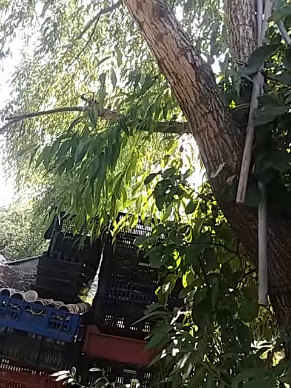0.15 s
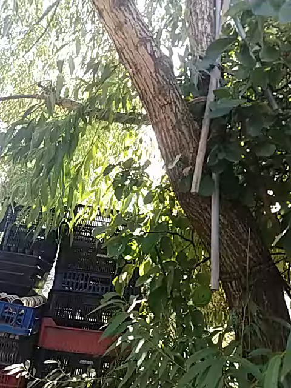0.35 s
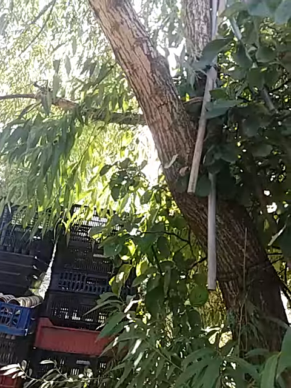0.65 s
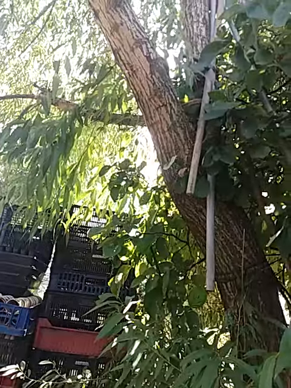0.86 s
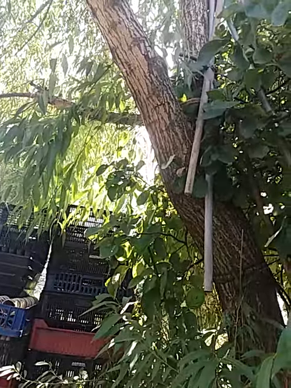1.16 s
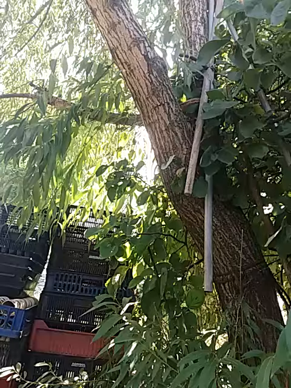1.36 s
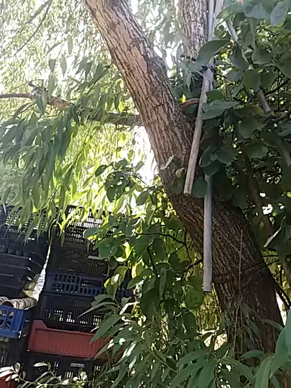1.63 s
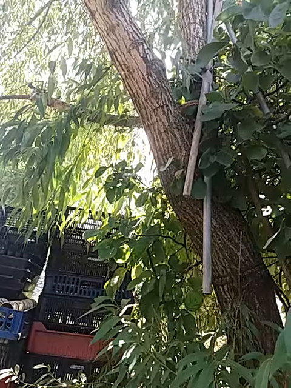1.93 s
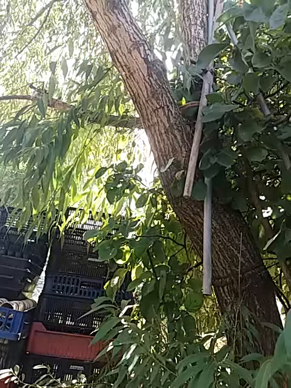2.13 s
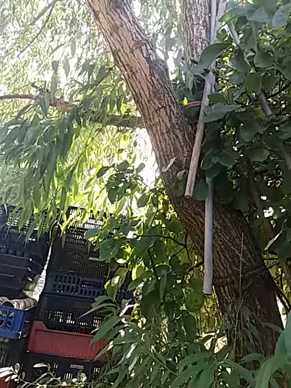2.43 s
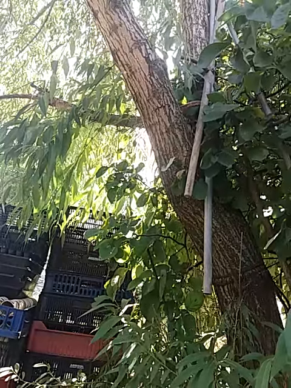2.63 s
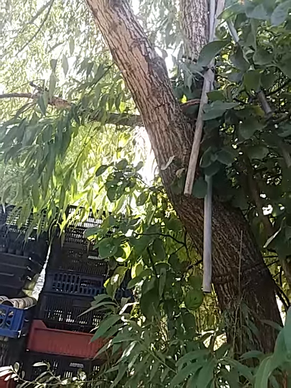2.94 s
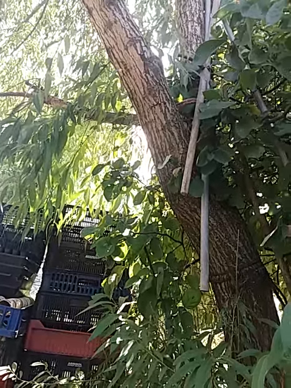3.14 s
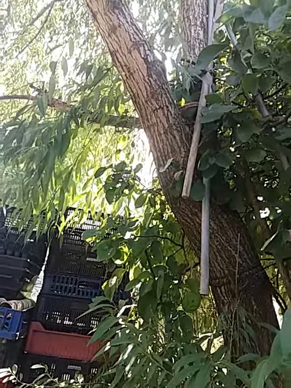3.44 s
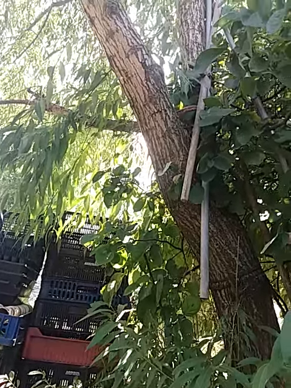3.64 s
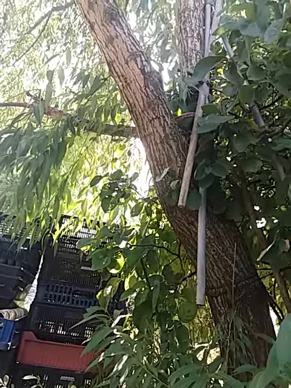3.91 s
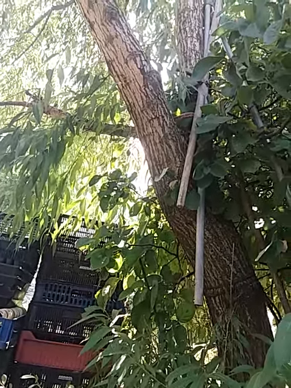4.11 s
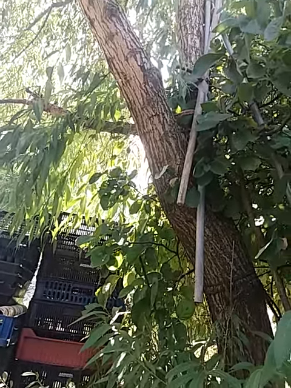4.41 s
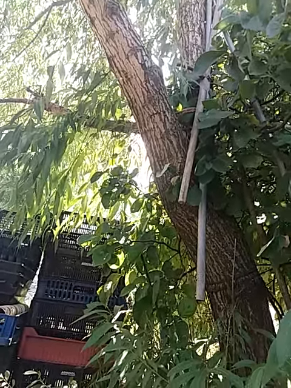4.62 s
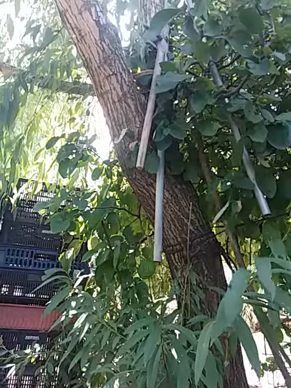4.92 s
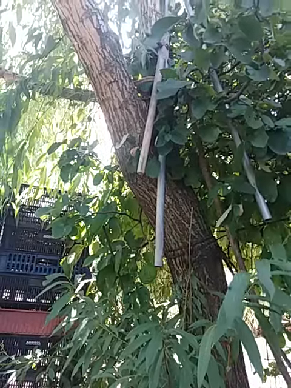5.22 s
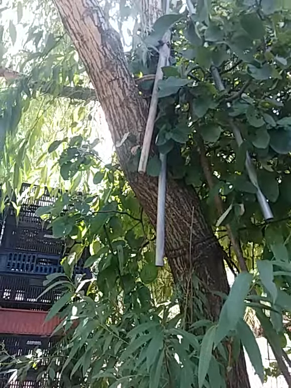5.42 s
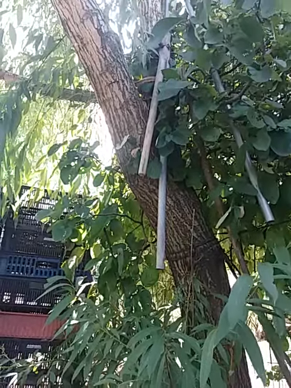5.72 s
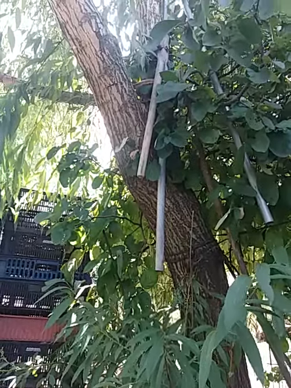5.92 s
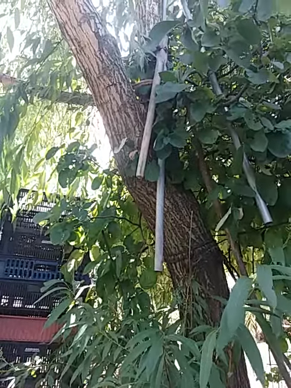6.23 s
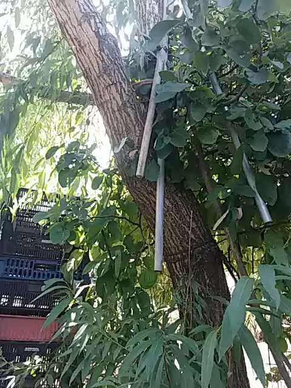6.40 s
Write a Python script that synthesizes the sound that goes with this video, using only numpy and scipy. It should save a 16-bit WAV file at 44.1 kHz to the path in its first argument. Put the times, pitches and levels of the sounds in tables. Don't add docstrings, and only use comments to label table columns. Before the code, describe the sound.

Loud, liquid quail calls snap out about once a second in a quiet leafy yard, with short echoes and faint distant birds.

```python
import sys
import numpy as np
from scipy import signal
from scipy.io import wavfile
from scipy.ndimage import uniform_filter1d, map_coordinates

SR = 44100
rng = np.random.default_rng(int(sys.argv[2]) if len(sys.argv) > 2 else 0)


def to_linear_factor(level_db):
    exponent = np.asarray(level_db, float) / 20
    return 10 ** exponent


def to_wav(s):
    ch = np.atleast_2d(s).T
    pcm = np.round(np.clip(ch, -1, 1) * 32767)
    wavfile.write(sys.argv[1], SR, pcm.astype(np.int16))


N = 289296


# time_ms, pitch_hz, level_db
NOTE_SHAPE = [(-21, 1480, -36), (-16, 1590, -10), (-11, 1790, 1.5), (-5, 1870, 4.4), (-1, 2340, -3.6),
              (1, 2580, 1), (2.5, 3350, -10), (5.5, 3950, -18), (8, 4500, -38)]
# time_ms, pitch_hz, level_db
LEAD_SHAPE = [(-37.5, 980, -25.5), (-30.5, 1080, -10.5), (-26, 1200, -9), (-19.5, 1400, -17.5),
              (-6, 980, -21)]
# whip_s, effort_db, lead_db
WHISTLED_NOTES = [(.285, -12, -38), (0.4691, -2, -22.5), (0.6105, -1, -31), (1.24, -3.5, -31),
                  (1.423, 0, -20), (1.563, -0.5, -29), (2.1676, -4.5, -33.5), (2.3529, -0.5, -22),
                  (2.4953, -1, -28), (3.1592, -4.5, -34), (3.3422, -0.5, -23), (3.485, -1.5, -27),
                  (4.653, 0.5, -36.5), (4.792, -1, -21.5), (5.4412, -4.5, -34), (5.6232, -0.5, -20),
                  (5.762, -0.5, -19.5), (6.3841, -4, -35), (6.5675, 1, -22.5)]


def quail_calls(hums, start, end):
    dry = np.zeros(N + SR // 10)
    ms = np.arange(-40, 10, 1000 / SR)
    for whip_s, effort_db, lead_db in WHISTLED_NOTES:
        if start - .1 < whip_s < end - .1:
            note = to_linear_factor(effort_db) * whistle(NOTE_SHAPE, ms)
            lead = to_linear_factor(lead_db) * whistle(LEAD_SHAPE, ms)
            add(dry, whip_s - .041, note + lead)
    for start_s, hum in hums:
        add(dry, start_s, hum)
    return dry


# pitch_hz, level_db
OVERTONE_STRENGTH = [(2350, -0.5), (2900, -49), (4800, -41), (5500, -49), (6200, -34), (7200, -51.5),
                     (8200, -28.5), (9500, -55)]


def whistle(shape, ms):
    at_ms, hz, db = np.transpose(shape)
    hz, level = np.interp(ms, at_ms, hz), to_linear_factor(np.interp(ms, at_ms, db, left=-99, right=-99))
    hz, level = uniform_filter1d([hz, level], size=40)
    turn = 2 * np.pi * np.cumsum(hz) / SR
    tone = np.sin(turn)
    for k in range(2, 6):
        overtone_db = read(OVERTONE_STRENGTH, k * hz) - 11 * (k - 2)
        tone += to_linear_factor(overtone_db) * np.sin(k * turn)
    return level * tone


# start_s, end_s, first_pitch_hz, level_db, beak_overtones_db
GROWLED_HUMS = [
    (0.249, 0.407, 1050, -61, 27.5),
    (0.508, 0.599, 955, -34, 15.5),
    (0.68, 0.77, 1040, -42.5, 15),
    (1.461, 1.547, 972, -33, 19.5),
    (2.396, 2.481, 976, -31.5, 15.5),
    (3.387, 3.46, 974, -31.5, 13),
    (4.723, 4.787, 980, -36, 2),
    (5.673, 5.739, 960, -38, 5.5),
]


def quail_hums():
    return [(row[0], growl(*row)) for row in GROWLED_HUMS]


# first_hz, last_hz
BEAK_SLIDE = [3000, 1870]


def growl(start, end, first_hz, db, beak_db):
    n = round((end - start) * SR)
    rise = np.linspace(1, 1.1, n)
    hz = first_hz * rise * (1 + .5 * uniform_filter1d(rng.standard_normal(n), size=200))
    turn = 2 * np.pi * np.cumsum(hz) / SR
    flutter_hz = 125 * (1 + 6 * uniform_filter1d(rng.standard_normal(n), size=400))
    flutter = 2 * np.pi * np.cumsum(flutter_hz) / SR
    swell = to_linear_factor(db + np.linspace(-9, 0, n)) * signal.windows.tukey(n, .3)
    beak_hz, beak_width_hz = np.linspace(*BEAK_SLIDE, n), 250
    upper = np.zeros(n)
    for k in range(2, 4):
        upper += np.sin(k * turn) / (1 + ((k * hz - beak_hz) / beak_width_hz) ** 2)
    low = (1 + 0.65 * np.cos(flutter)) * np.sin(turn)
    return swell * (low + to_linear_factor(beak_db) * (.5 + .5 * np.cos(flutter)) ** 2 * upper)


SCENE_CHANGES = [.337, 4.716, 7]
# delay_ms, signed_gain
NEAR_FIRST = [(-.75, -.025), (-.25, .08), (.52, .061), (1.02, -.067), (2.27, -.04), (3.33, .029),
              (4.47, -.044), (10.2, .026), (19.14, -.027), (20.48, -.018)]
NEAR_SECOND = [(-.63, .019), (.09, .059), (1.13, .043), (2.04, .019), (2.61, -.024), (3.04, -.036),
               (3.42, -.017), (7.91, -.024), (15.6, .02), (17.48, .03)]
CLOSENESS = [3.5, 4.5]
# extra_path_m, depth_m, rise_db
WALLS_FIRST = [(6, 7, 7), (20, 4.5, 3.5), (38, 6.2, 4), (53, 12, 3), (102.2, 20, 1.5)]
WALLS_SECOND = [(0, 19, 4.6), (31, 2.6, 4.7), (50, 7, 6.4), (85, 20, 1.8)]
WALL_GAPS = [-1, -2]


def quail_in_yard():
    t, out = np.arange(N) / SR, np.zeros(N)
    hums = quail_hums()
    spots = zip(SCENE_CHANGES, SCENE_CHANGES[1:], (NEAR_FIRST, NEAR_SECOND), CLOSENESS,
                (WALLS_FIRST, WALLS_SECOND), WALL_GAPS)
    for start, end, near, near_db, walls, gap_db in spots:
        heard = yard(quail_calls(hums, start, end), near, near_db, walls, gap_db)[:N]
        here = 1. * ((t >= start) & (t < end))
        out += heard * uniform_filter1d(here, size=40)
    return out


def yard(dry, near, near_db, walls, gap_db):
    taps = np.zeros(SR // 10)
    delay_ms, gain = np.transpose(near)
    taps[np.round((delay_ms + 1) * SR / 1000).astype(int)] = gain
    sway = .35 * np.arange(len(dry)) / SR
    late = np.zeros(len(dry))
    for share in (np.cos, np.sin):
        late += signal.fftconvolve(dry * share(sway), tail(walls, gap_db))[:len(dry)]
    return to_linear_factor(near_db) * signal.fftconvolve(dry, taps)[:len(dry)] + late


# pitch_hz, level_db, foliage_fade_60db_s, far_wall_fade_60db_s
YARD_TAIL = [(980, -22.5, 0.17, 0.4), (1500, -13, 0.36, 0.42), (1740, -30, 0.18, 0.73),
             (2150, -18.5, 0.44, 0.93), (2500, -19, 0.27, 0.7), (3300, -18, .25, 0.82),
             (4300, -17.5, 0.23, 0.75), (6440, -14, 0.54, .5)]


def tail(walls, gap_db):
    taps = np.zeros(SR)
    at = np.arange(200, SR - 20, 20)
    strength = rng.choice([-1., 1.], len(at)) * to_linear_factor(3 * rng.standard_normal(len(at)))
    taps[at + rng.integers(0, 20, len(at))] = strength
    hz, t, z = signal.stft(taps, SR, nperseg=128)
    db, leaves_s, far_s = (read(YARD_TAIL, hz, col=k)[:, None] for k in range(1, 4))
    path_m = 343 * t
    z *= to_linear_factor(db - 20.0 + gap_db + bumps(path_m, walls)) * np.tanh(t / 0.0032) ** 2
    far_walls_db = -16.5
    z *= np.hypot(to_linear_factor(-60 * t / leaves_s), to_linear_factor(far_walls_db - 60 * t / far_s))
    return signal.istft(z, SR, nperseg=128)[1]


# time_s, peak_db, centre_hz, width_hz
LEAF_TICKS = [
    (.599, -41.5, 450, 594),
    (1.187, -45.5, 8900, 8000),
    (4.116, -58.5, 2023, 1500),
    (4.449, -58.5, 1990, 501),
    (5.062, -37.5, 8040, 2500),
    (5.094, -52.5, 6100, 900),
]


def ticks():
    out, t = np.zeros(N), np.arange(600) / SR
    for s, db, hz, width_hz in LEAF_TICKS:
        ring = np.exp(-np.pi * width_hz * t) * np.cos(2 * np.pi * hz * t)
        snap = rng.standard_normal(60) * np.exp(-np.arange(60) / 15)
        burst = np.convolve(np.convolve(snap, ring), ring)
        add(out, s, to_linear_factor(db) * burst / abs(burst).max())
    return out


# start_s, end_s, first_pitch_hz, last_pitch_hz, level_db
FAR_CALLS = [(0, 0.02, 4300, 4300, -76), (.3, 0.36, 2050, 2150, -58.5), (1.054, 1.156, 2290, 2042, -64),
             (1.78, 1.896, 3940, 3443, -71), (2.07, 2.162, 2720, 2650, -66),
             (5.099, 5.161, 2410, 2100, -63), (3.0, 3.123, 4140, 2917, -70), (3.88, 3.98, 4160, 3180, -72),
             (4.2, 4.258, 3590, 3300, -76), (4.6, 4.696, 2550, 2656, -72), (4.67, 4.72, 3730, 3460, -77.5),
             (.45, .52, 173, 197, -57), (2.8, 2.9, 216.4, 181.3, -61.5), (3.32, 3.46, 226, 175, -60.5),
             (4.17, 4.28, 482, 430, -70)]


def far_birds():
    dry = np.zeros(N)
    for row in FAR_CALLS:
        add(dry, row[0], slide(*row, wobble=.7))
    smear = rng.standard_normal(3000) * to_linear_factor(-60 * np.arange(3000) / SR / 0.3)
    return 0.28 * dry + signal.fftconvolve(dry, smear / np.linalg.norm(smear))[:N]


def slide(start, end, first_hz, last_hz, db, wobble):
    n = round((end - start) * SR)
    tremble = 1 + wobble * uniform_filter1d(rng.standard_normal(n), size=150)
    hz = np.linspace(first_hz, last_hz, n) * tremble
    return to_linear_factor(db) * np.sin(2 * np.pi * np.cumsum(hz) / SR) * signal.windows.tukey(n, .7)


# pitch_hz, level_db_per_hz
AIR_COLOUR = [(28, -55.5), (60, 3.5), (120, -8), (270, -4), (350, -12.5), (1600, -13.5), (5300, -33.5),
              (8000, -30.5)]
# time_s, half_length_s, rise_db
WIND_PUFFS = [
    (.45, .1, 9),
    (0.617, 0.035, 6),
    (3.556, .04, 3.5),
    (3.738, 0.029, 11),
    (4.815, 0.039, 7.5),
    (5.322, .05, 4),
    (5.977, 0.057, 13),
    (6.49, 0.063, 7),
]
GATE_LIFT = [3.9, 3.13, 0.58, 1.7, 4]


def air(bird):
    frames, hz = N // 256 + 5, np.fft.rfftfreq(1024, 1 / SR)
    a, b, patches = rng.standard_normal((frames, 513, 3)).T
    patches = uniform_filter1d(uniform_filter1d(patches, size=8, axis=0), size=12, axis=1)
    t = np.arange(frames) * 256 / SR
    bird_power = abs(uniform_filter1d(bird ** 2, size=2000))
    bird_db = 10 * np.log10(np.interp(t, np.arange(N) / SR, bird_power) + 1e-12)
    open_gate = uniform_filter1d(np.clip((bird_db + 66.0) / 12, 0, 1), size=10)
    pause_s = t - np.maximum.accumulate(t * (open_gate > .5))
    gust, murmur, middle, leaves, hiss = np.outer(GATE_LIFT, open_gate)
    gust = gust + bumps(t, WIND_PUFFS)
    middle = middle - 5 * pause_s
    drift = np.array([gust, gust, murmur, murmur, middle, middle, leaves, leaves, hiss, hiss])
    corners = np.log([20, 90, 150, 600, 1000, 3500, 5000, 7000, 9000, 22050])
    place = np.interp(np.log(hz + 1), corners, np.arange(10))
    drift = map_coordinates(drift, np.meshgrid(place, np.arange(frames), indexing="ij"), order=1)
    patchy_db = 1.5 / (1 + (hz[:, None] / 3000) ** 2)
    drone = [(524, 53, 5.5)]
    colour = to_linear_factor(read(AIR_COLOUR, hz) + bumps(hz, drone))[:, None]
    z = (a + 1j * b) * colour * to_linear_factor(drift + patchy_db * patches / patches.std())
    level = to_linear_factor(-56) / np.sqrt(np.sum(colour ** 2)) / 1.72
    return level * signal.istft(z, nperseg=1024, noverlap=768)[1][:N]


def read(points, hz, col=1):
    table = np.array(points)
    return np.interp(np.log(hz + 1), np.log(table[:, 0] + 1), table[:, col])


def bumps(x, rows):
    return sum(db * np.exp(-((x - at) / width) ** 2) for at, width, db in rows)


def add(mix, s, sound):
    part = mix[round(s * SR):][:len(sound)]
    part += sound[:len(part)]


def scene():
    bird = quail_in_yard()
    return (bird + far_birds() + ticks() + air(bird))[None]


def roll_off(x):
    return signal.sosfilt(signal.butter(12, 15720, fs=SR, output="sos"), x)


def record(dry):
    mix = dry - .0006
    return roll_off(mix)


dry = scene()
out = record(dry)
to_wav(out)
```